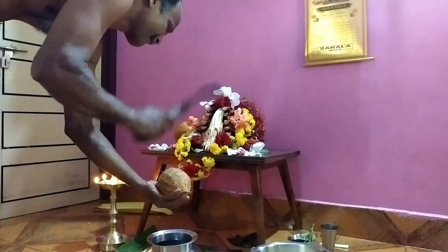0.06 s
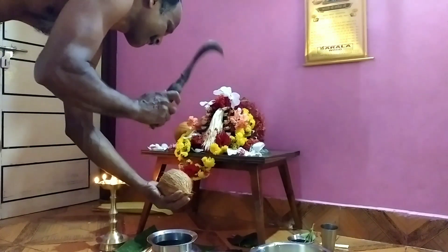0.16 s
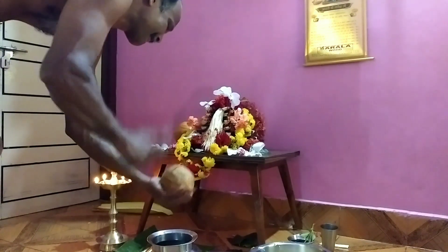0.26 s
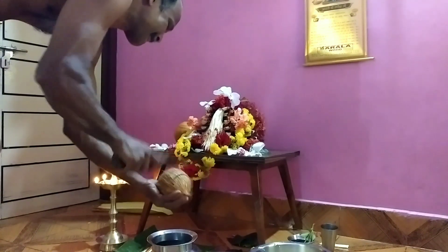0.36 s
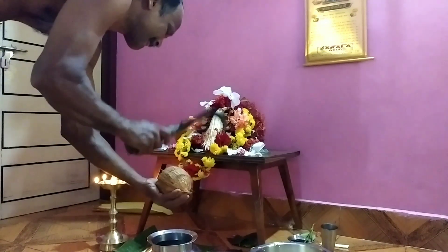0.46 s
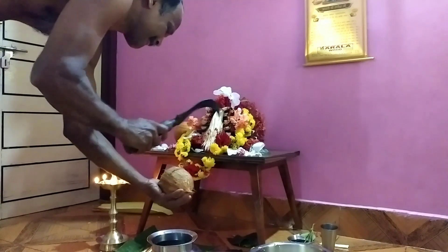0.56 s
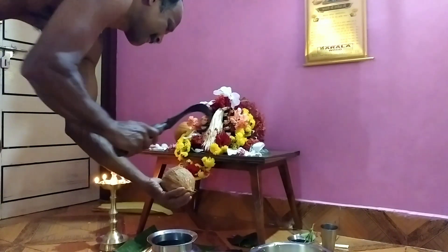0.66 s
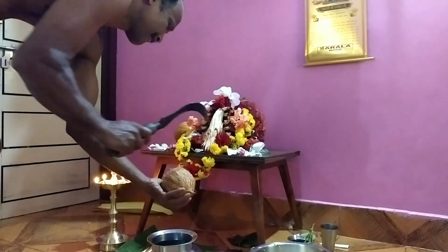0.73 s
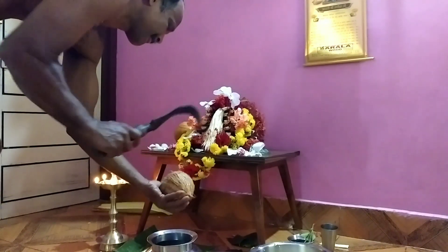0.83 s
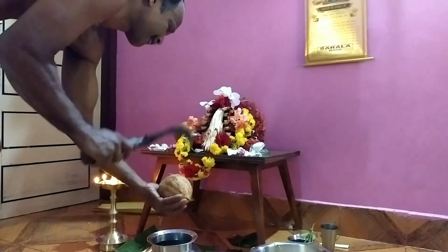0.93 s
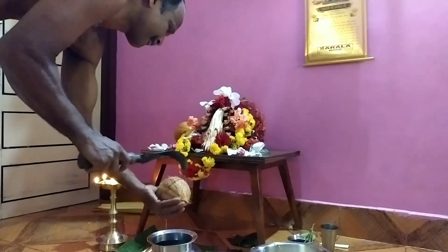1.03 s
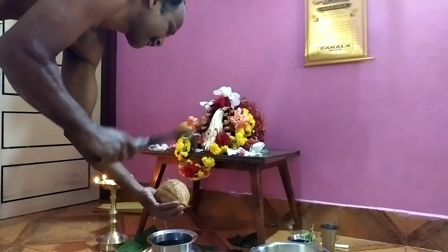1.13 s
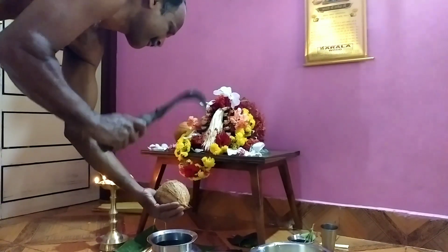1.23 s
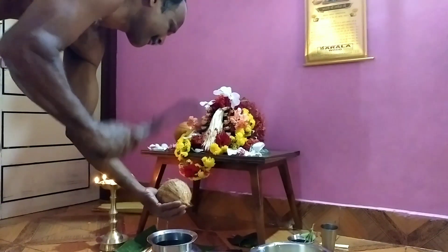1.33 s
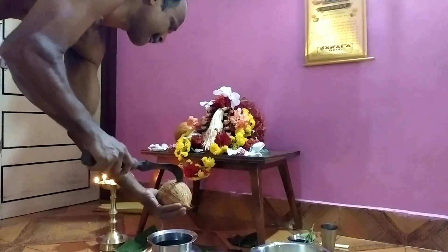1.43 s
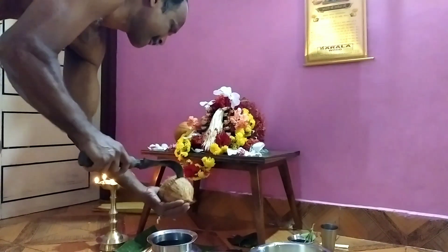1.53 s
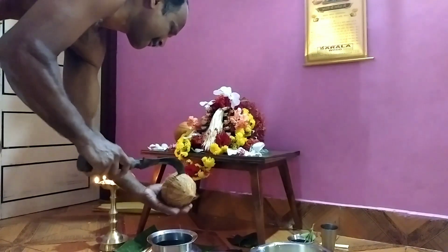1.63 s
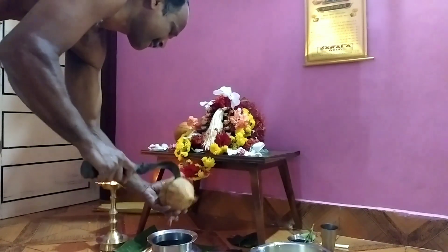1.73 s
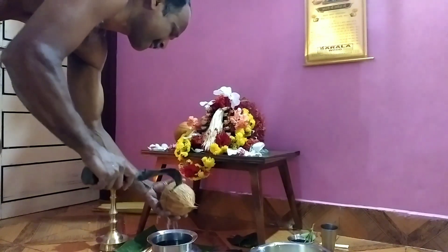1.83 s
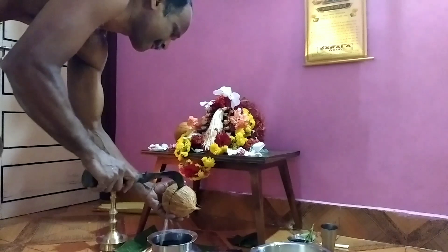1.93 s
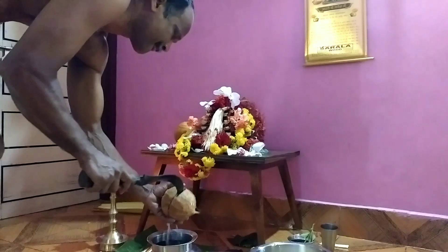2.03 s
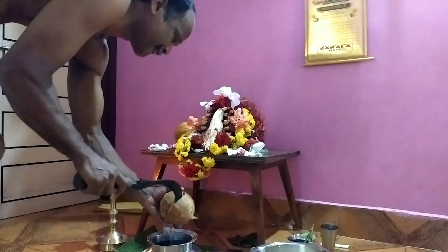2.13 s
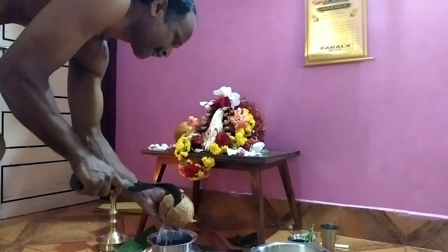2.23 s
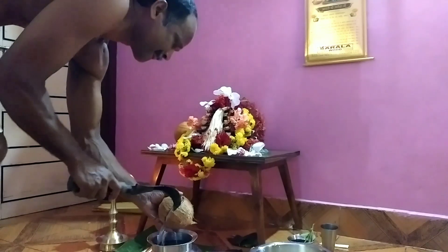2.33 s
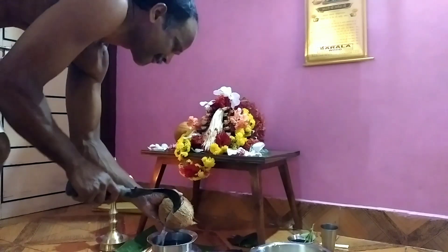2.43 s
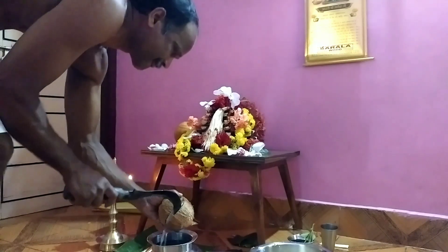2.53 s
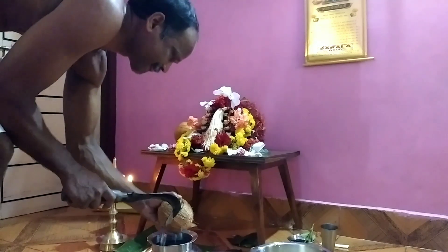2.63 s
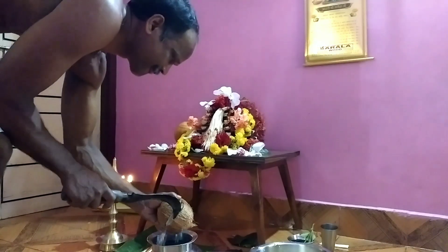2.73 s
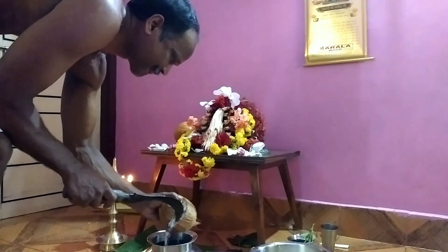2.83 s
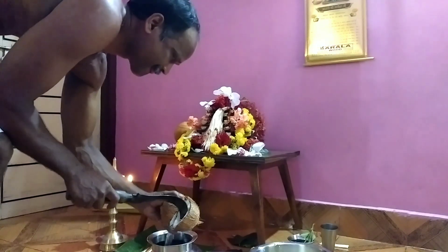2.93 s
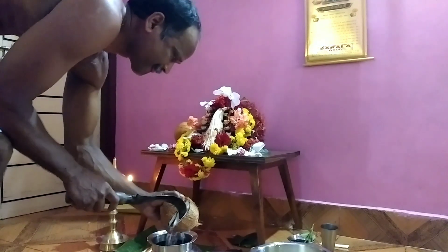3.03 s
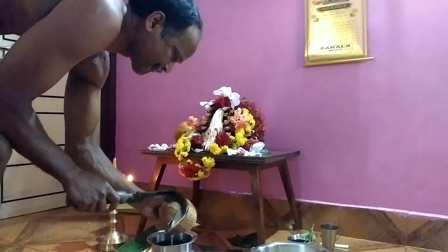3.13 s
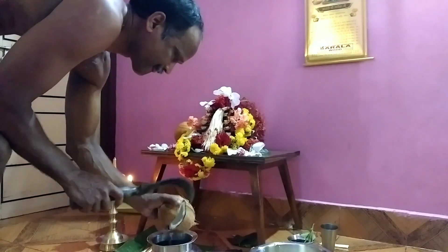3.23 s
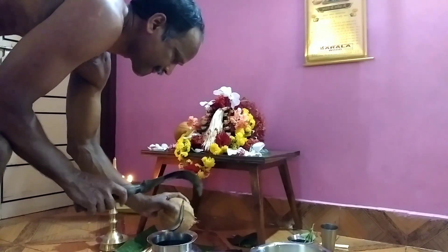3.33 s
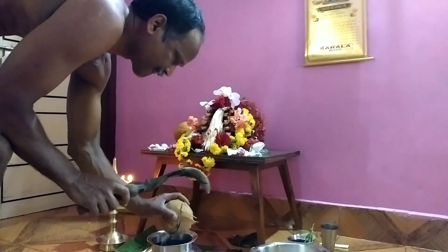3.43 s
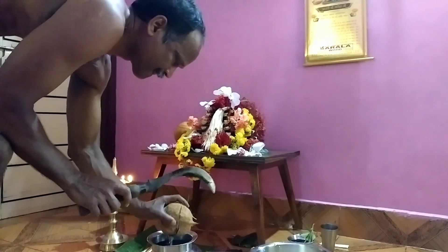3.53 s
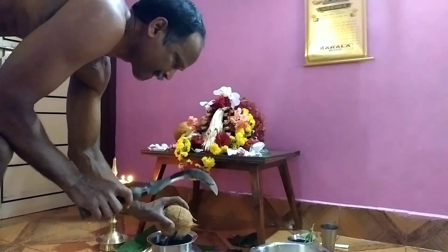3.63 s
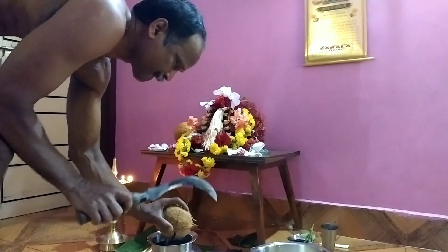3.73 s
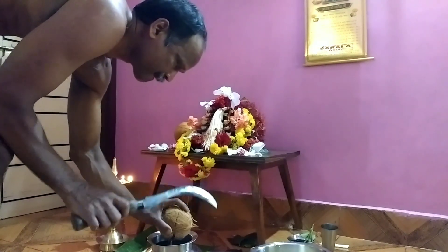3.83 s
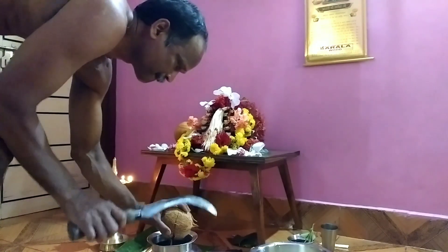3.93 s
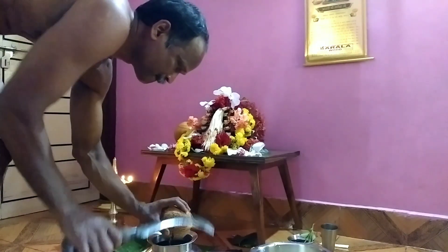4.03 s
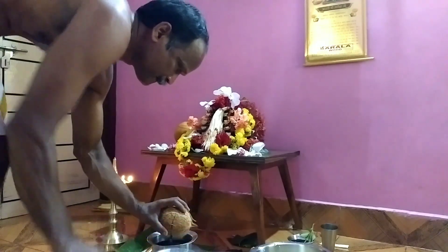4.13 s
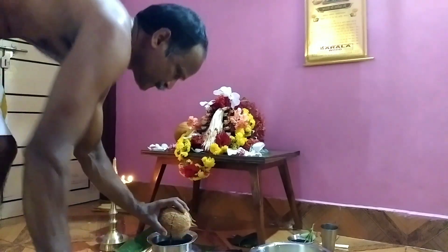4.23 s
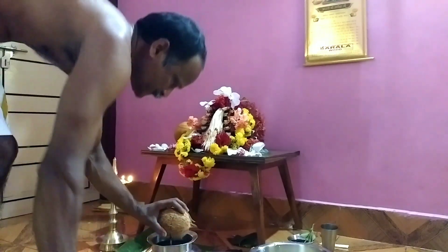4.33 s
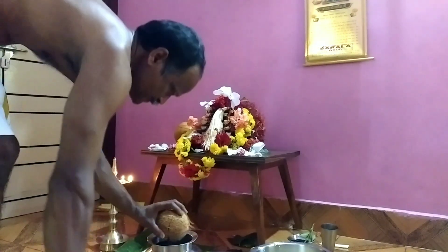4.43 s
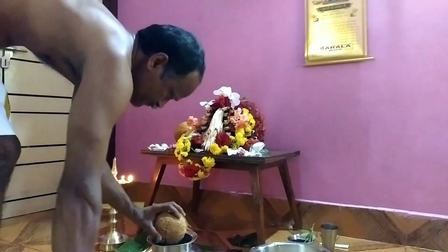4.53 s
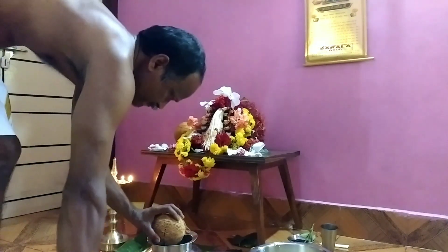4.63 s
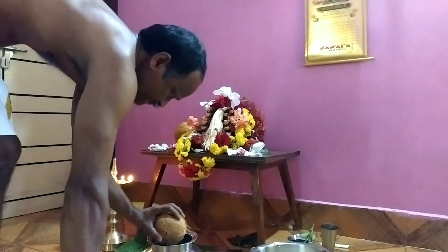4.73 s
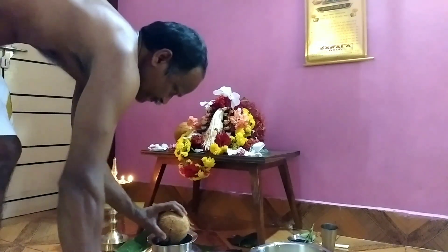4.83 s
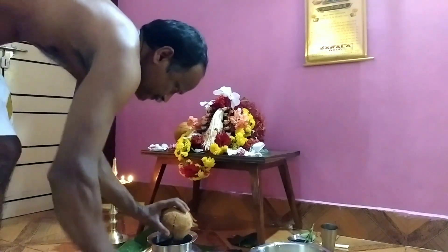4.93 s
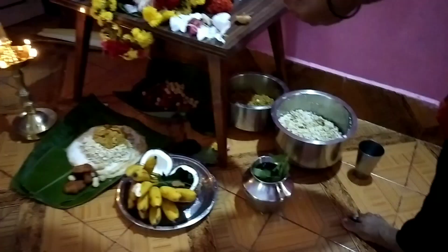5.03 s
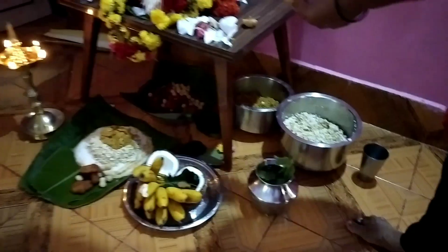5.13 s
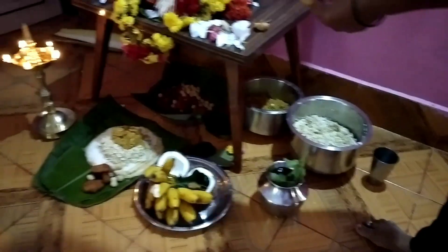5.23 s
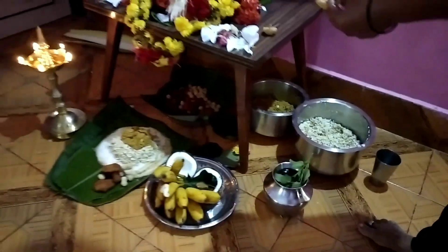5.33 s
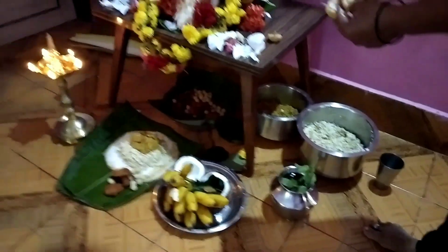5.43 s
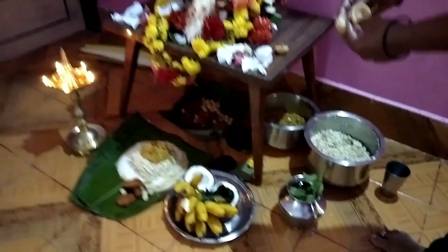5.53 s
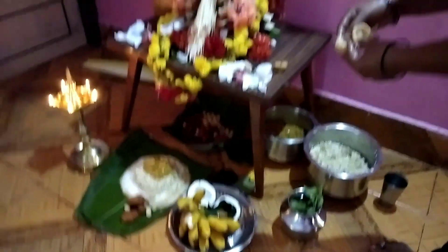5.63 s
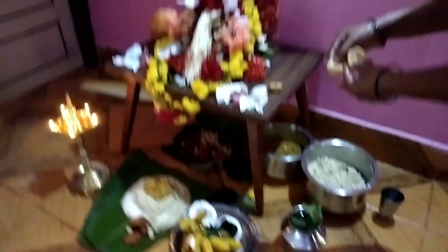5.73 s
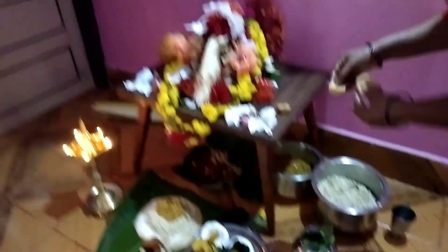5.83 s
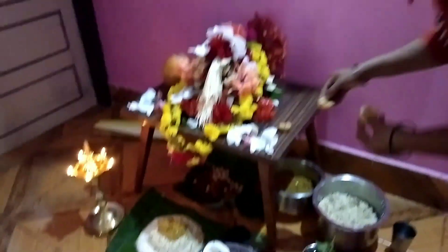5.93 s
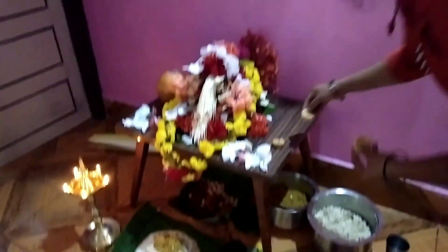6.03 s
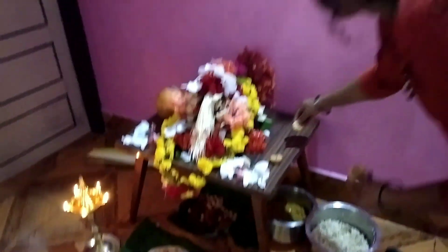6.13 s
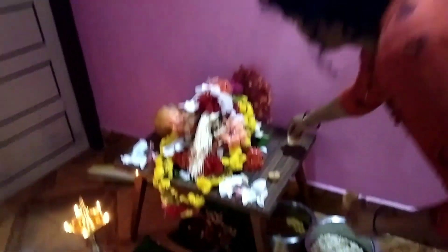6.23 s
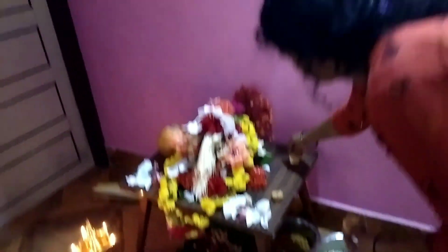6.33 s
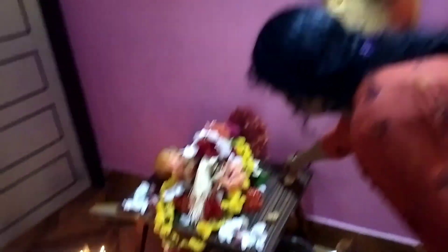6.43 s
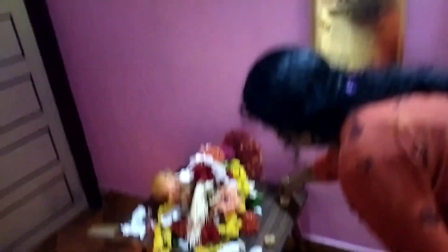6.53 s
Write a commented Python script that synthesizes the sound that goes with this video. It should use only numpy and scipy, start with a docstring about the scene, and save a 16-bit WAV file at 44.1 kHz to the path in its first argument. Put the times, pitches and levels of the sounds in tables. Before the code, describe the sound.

A phone close by catches three woody, steely whacks on a coconut, the first loudest, with bright room reverberation. Sharp cracks follow as the shell is prised apart and its water fizzes, plops and glugs into a ringing metal pot. After the flow dwindles, a blade lands hard on tile and clatters. A hard cut leads to faint hiss, a thin flickering high tone and small dry bumps.

```python
"""Bare tiled room: over the tail of an earlier blow, a heavy knife strikes a coconut three times. The shell
cracks and is prised open; its water gulps out, splashes and trickles into a metal pot; the knife lands on the tiles.
After a cut to silence a quieter shot fades in: hiss, a thin flickering high tone, handling knocks. Impacts are shaped
noise bursts with room tails; water is patchy noise, drops and bubbles; gain control and a limiter hold loud sounds down.
"""
import sys
import numpy as np
from scipy import signal
from scipy.fft import rfft, irfft, next_fast_len
from scipy.io import wavfile
from scipy.ndimage import uniform_filter1d, minimum_filter1d, map_coordinates

SR = 44100
rng = np.random.default_rng(int(sys.argv[2]) if len(sys.argv) > 2 else 0)


def master_out(mix):
    """Clip the mix to full scale and print it as 16-bit PCM to the path in sys.argv[1]."""
    frames = np.transpose(np.atleast_2d(mix))
    ceiling = np.clip(frames, -1, 1)
    pcm = np.round(ceiling * 32767).astype(np.int16)
    wavfile.write(sys.argv[1], SR, pcm)


N = 289737
LEAD_S = .01  # from the start of an impact buffer to its onset
CUT_S, BACK_S = 4.9303, 5.055  # first shot ends, second begins
SIDES = np.array([[.5], [-.5]])  # splits a left-minus-right dB between the channels


def amp(db):
    """Decibels to gain."""
    return 10 ** (np.asarray(db) / 20)


def unit(x):
    """Scaled to rms 1."""
    return x / np.sqrt(np.mean(x ** 2) + 1e-20)


def along(points, hz):
    """Interpolates (f/Hz, value) points on a log frequency axis."""
    f, v = np.transpose(points)
    return np.interp(np.log(hz + 1), np.log(f + 1), v)


def wobble(rate_hz, size=N):
    """Smooth random curve with rate_hz knots a second."""
    knots = rng.standard_normal(int(size * rate_hz / SR) + 4)
    return map_coordinates(knots, [np.arange(size) * rate_hz / SR])


def patches(shape, bins, frames):
    """Random field of rms 1, smooth over some bins and frames."""
    field = uniform_filter1d(rng.standard_normal(shape), size=bins, axis=0)
    return unit(uniform_filter1d(field, size=frames, axis=1))


def filtered(x, response):
    """Multiplies the spectrum of x by a complex response of frequency."""
    m = next_fast_len(x.shape[-1] + 8192)
    spectrum = rfft(x, m) * response(np.fft.rfftfreq(m, 1 / SR))
    return irfft(spectrum, m)[..., :x.shape[-1]]


def resonances(modes, f):
    """Causal sum of (f/Hz, width/Hz, level/dB) resonances of alternating sign."""
    total = 0
    for k, (centre, width, db) in enumerate(modes):
        damping = 1j * f * width
        total = total + (-1) ** k * amp(db) * damping / (centre * centre - f * f + damping)
    return total


def hump(hz, width):
    """One spectral hump: a resonance squared; width is a share of hz, at least .05."""
    return lambda f: resonances([(hz, max(width, .05) * hz, 0)], f) ** 2


# left-right likeness: f/Hz, likeness [0-1]
LIKENESS = [(100, 0.96), (300, 0.18), (600, 0.33), (900, 0.51), (1500, 0.018), (15000, .05)]


def stereo(pair):
    """Mixes two signals as mid and side; likeness per frequency sets their shares."""
    turn = lambda hz: np.arccos(np.clip(along(LIKENESS, hz), -1, 1)) / 2
    mid, side = filtered(pair, lambda hz: np.array([np.cos(turn(hz)), np.sin(turn(hz))]))
    return np.array([mid + side, mid - side])


def add(track, s, sound):
    """Mixes in a sound whose onset, LEAD_S after its start, falls at s."""
    k = round((s - LEAD_S) * SR)
    part = sound[:, max(-k, 0):N - k]
    track[:, max(k, 0):max(k, 0) + part.shape[1]] += part


# room decay: f/Hz, t60/s
ROOM_DECAY = [(100, 1.4), (260, 0.91), (700, 0.83), (1840, 0.71), (4850, 0.65), (12800, 0.4)]
ECHO_REF_DB = -18.5  # tail rms re burst peak at echo_db 0


def room_tail(size):
    """Overlapping noise grains; each frequency decays at its own t60, unevenly."""
    hz, frame_s = np.fft.rfftfreq(256, 1 / SR), np.arange(size // 128 + 2) * 128 / SR
    shape = (len(hz), len(frame_s))
    lingering_db = 2.89 * patches(shape, 2, 70)
    standout_db = .7 * patches(shape, 20, 2)
    gain = amp(lingering_db + standout_db - 60 * frame_s / along(ROOM_DECAY, hz)[:, None]).T
    window = np.sin(np.pi * (np.arange(256) + .5) / 256)
    grains = irfft(rfft(rng.standard_normal((2, len(frame_s), 256))) * gain) * window
    return (grains[:, :-1, 128:] + grains[:, 1:, :128]).reshape(2, -1)[:, :size]


def impact(colour, db, echo_db, rise_s, size):
    """Short decaying noise burst and its room tail, both through one colour."""
    t = np.maximum(np.arange(size) / SR - LEAD_S, 0)
    start = 1 - np.exp(-t / max(rise_s, 1e-4))
    burst = start * amp(-60 * t / (0.011 + 3 * rise_s)) * rng.standard_normal((2, size))
    build_up = 1 - np.exp(-t / 0.0017)  # echoes need a few ms to pile up
    tail = room_tail(size) * start * build_up
    burst, tail = filtered(np.array([burst, tail]), colour)
    tail = tail / np.sqrt(np.mean(tail[:, :SR // 10] ** 2))
    return amp(db) * (burst / np.abs(burst).max() + amp(echo_db + ECHO_REF_DB) * tail)


def knocks(table, echo_db, cycles, size):
    """Small impacts, one hump each; the rise time spans some cycles of its centre."""
    out = np.zeros((2, N))
    for s, db, hz, width in table:
        add(out, s, impact(hump(hz, width), db, echo_db, cycles / hz, size))
    return out


# hiss spectrum: f/Hz, relative level/dB
HISS_SPECTRUM = [(18, -57.5), (30, -38), (75, -12.5), (240, -8), (450, -6), (860, -8.5), (2000, -13),
                 (4300, -11), (6000, -18), (8300, -20.5), (8800, -8), (10200, -9.5), (10700, -24),
                 (15000, -27.5)]
# hiss balance: f/Hz, left minus right/dB
HISS_BALANCE = [(100, 8), (700, -1.5), (2000, 2.5), (4400, -1.5), (8000, 3), (14000, 8)]


def hiss(db):
    """Room and microphone noise: shaped noise, slightly wavering, balance varying with frequency."""
    colour = lambda f: amp(along(HISS_SPECTRUM, f) + SIDES * along(HISS_BALANCE, f))
    noise = filtered(rng.standard_normal((2, N)), colour)
    return amp(db + 0.39 * wobble(7.3)) * unit(noise)


TONE_HZ, TONE_DRIFT_HZ, TONE_JITTER_HZ = 10080, 70.7, 40
TONE_BASE_DB, TONE_SLOW_FLICKER_DB, TONE_FAST_FLICKER_DB = -74.5, 3.5, 6
TONE_SIDES_DB = [[5], [-1.5]]  # left, right re base


def high_tone():
    """Thin flickering high sine, random in pitch and level, stronger on the left."""
    hz = TONE_HZ + TONE_DRIFT_HZ * wobble(9) + TONE_JITTER_HZ * wobble(40)
    tone = np.sin(2 * np.pi * np.cumsum(hz) / SR)
    level_db = TONE_BASE_DB + TONE_SLOW_FLICKER_DB * wobble(14) + TONE_FAST_FLICKER_DB * wobble(30)
    return amp(TONE_SIDES_DB) * amp(level_db) * tone


# knocks close to the phone: t/s, burst level/dB, f/Hz, width/f
HANDLING_KNOCKS = [(5.238, -50, 4510, .3), (5.326, -63, 110, .6), (5.604, -53.5, 688, 0.98),
                   (5.628, -53, 468, .46), (5.652, -53, 455, 0.74), (5.716, -53.5, 227, .5),
                   (5.718, -48, 1200, 2.3), (6.392, -36.5, 2240, 4.7), (6.505, -51.5, 700, 0.89),
                   (6.55, -60.5, 440, 0.56)]


def handling():
    """Small dry impacts, little room tail."""
    return knocks(HANDLING_KNOCKS, echo_db=-14, cycles=1.17, size=SR // 5)


def bubbles(count):
    """Droplets trap air that rings for a few cycles at a rising pitch."""
    when, pitch, size, side = rng.random((count, 4)).T[:, :, None]
    t = np.arange(1500) / SR
    hz = 1500 * 3.5 ** pitch
    life_s = 14 / hz
    envelope = amp(9.9 * size - 26 * t / life_s) * (1 - np.exp(-8 * t / life_s))
    blips = envelope * np.sin(2 * np.pi * hz * t * (1 + 0.15 * t / life_s))
    where = ((when * (N - len(t))).astype(int) + np.arange(len(t))).ravel()
    return np.array([np.bincount(where, (blips * share).ravel(), N) for share in (side, 1 - side)])


# trickle level: t/s, level/dB
TRICKLE_LEVEL = [(1.996, -45), (2.4, -45.5), (2.7, -45.5), (3.1, -40), (3.4, -47), (3.58, -57), (3.9, -55),
                 (4.2, -53.5), (4.6, -57), (4.93, -68.5)]
# water spectrum: f/Hz, relative level/dB
WATER_SPECTRUM = [(350, -37.5), (700, -13.5), (1300, -18.5), (2100, -12), (3800, -7.5), (6000, -9),
                  (8800, -1), (12000, -4), (15000, -7.5)]


def trickle():
    """Water running into the pot: patchy fizz, random drop clicks and ringing bubbles."""
    s, db = np.transpose([(1.982, -90)] + list(TRICKLE_LEVEL))
    level_db = np.interp(np.arange(N) / SR, s, db)
    z = signal.stft(rng.standard_normal((2, N)), nperseg=512)[2]
    patchy = z * amp(2.9 * patches(z.shape[1:], 10, 2))
    fizz = signal.istft(patchy, nperseg=512)[1][:, :N]
    hits = rng.random(N) < 300 / SR  # 300 drops/s on average
    drops = hits * amp(5 * rng.exponential(1, N)) * rng.standard_normal((2, N))
    mix = unit(fizz) + 0.29 * unit(drops) + 0.28 * unit(bubbles(count=260))
    water = filtered(mix, lambda f: amp(along(WATER_SPECTRUM, f)))
    return amp(level_db + 3.1 * wobble(9.9)) * unit(water)


# hollow notes and thuds: t/s, burst level/dB, f/Hz, width/f
PLOP_HITS = [(1.992, -41.5, 556, 0.57), (2.04, -47, 530, 0.072), (2.2, -52, 747, 0.12),
             (2.33, -52, 754, 0.18), (2.572, -48, 1350, 0.044), (2.62, -54.5, 1096, 0.04),
             (2.87, -42, 827, 0.24), (2.92, -48.5, 312.5, 0.15), (2.94, -34.5, 960, 0.54),
             (3.1, -44, 1400, .17), (3.305, -37.5, 380, 0.85), (3.33, -37, 328, 0.64),
             (3.36, -39, 407, 1.8), (4.085, -46.5, 1480, 0.31), (4.472, -46, 1045, 0.19),
             (4.56, -49.5, 1133, 0.043), (4.645, -48, 633, 0.33), (4.807, -31.5, 335, 1.8),
             (4.815, -38, 1450, .08)]


def plops():
    """Slow-rising hollow humps with a strong room tail."""
    return knocks(PLOP_HITS, echo_db=7, cycles=7, size=3 * SR // 5)


# water leaving the shell: t/s, burst level/dB, f/Hz, width/f
GULP_HITS = [(3.2, -30, 2800, 1.7), (3.219, -26, 2030, 0.43), (3.238, -27.5, 3930, 0.41),
             (3.278, -28, 2230, 0.4), (3.635, -37, 2090, .2), (3.652, -29.5, 2880, .6),
             (3.812, -31.5, 2200, 1.2), (4.574, -25, 3890, .3)]


def gulps():
    """Close, dry gulps: slow-rising humps with a weak room tail."""
    return knocks(GULP_HITS, echo_db=-5.5, cycles=9, size=SR // 3)


# splashes into the pot, fibre snaps: t/s, burst level/dB, f/Hz, width/f, softness [0-1]
SNAP_HITS = [(1.990, -25.5, 5125, 7.1, 0.2), (2.034, -26.5, 5540, 1.9, 0.3), (2.129, -37, 8900, 1.3, .6),
             (2.157, -38, 3850, .55, 0.45), (2.221, -36, 3060, .55, 0.6), (2.23, -35.5, 9100, 0.55, 1),
             (2.265, -18, 4820, 0.39, 0.01), (2.403, -20.5, 6500, 2.2, .01), (2.440, -18, 5120, 1.02, 0.31),
             (2.469, -43, 2320, 0.56, .64), (2.741, -21.5, 6800, .54, 0.18),
             (2.858, -19.5, 6000, 2.2, 0.55), (2.925, -4.5, 6600, 2.2, .02),
             (2.94, -17.5, 7360, 0.37, 0.33), (3.14, -32.5, 6240, 1, 0.95), (3.24, -34.5, 4420, 0.83, 0.85),
             (3.285, -33, 6350, 1.2, 0.89), (3.33, -29.5, 1670, 1.9, 0.31), (3.439, -35, 10400, 0.25, 0.3),
             (3.599, -36, 6650, 1.8, 0.54), (3.619, -27.5, 7160, 1.1, 0.48),
             (3.653, -34.5, 2980, 1.5, 0.68), (3.76, -43, 1990, .4, 0.9), (3.796, -33.5, 7540, 1.5, 0.87),
             (3.805, -33.5, 2400, 1.4, 0.56), (3.866, -32.5, 7400, 0.44, 0.45), (4.0, -43.5, 8250, .7, 0.9),
             (4.021, -41, 4770, 0.51, 0.92), (4.158, -41.5, 7100, .8, 0.6), (4.228, -47.5, 2660, .7, 0.4),
             (4.236, -33, 7100, 1.8, 0.83), (4.361, -33.5, 8400, 0.18, 0.54), (4.375, -42, 2470, .5, .8),
             (4.44, -39, 3580, .6, 0.59), (4.543, -36.5, 7100, 6.2, 0.87)]
# pot ring: f/Hz, width/Hz, level/dB
POT_MODES = [(1428, 21, 5), (1986, 53, 6), (2444, 98, -3), (2955, 95, 8), (3860, 89, -8.5),
             (4670, 200, 7.5), (7350, 180, -5), (8280, 140, 4)]
SHARP_RISE_S, SOFT_RISE_S, SHARP_ECHO_DB, SOFT_ECHO_DB = .0004, 0.016, -4, 9.5


def snaps():
    """Splashes and snaps, one hump each, all ringing the pot; softness slows the start and feeds the wash."""
    out = np.zeros((2, N))
    for s, db, hz, width, soft in SNAP_HITS:
        soft = np.clip(soft, 0, 1)
        colour = lambda f: hump(hz, width)(f) * (1 + resonances(POT_MODES, f))
        rise_s = SHARP_RISE_S * (SOFT_RISE_S / SHARP_RISE_S) ** soft
        echo_db = SHARP_ECHO_DB + soft * (SOFT_ECHO_DB - SHARP_ECHO_DB)
        add(out, s, impact(colour, db, echo_db, rise_s, size=2 * SR // 5))
    return out


# knife meets tiles: t/s, burst level/dB, echo/dB
TILE_CONTACTS = [(4.645, -5.5, 1.5), (4.659, -16.5, 7), (4.686, -27.5, -15), (4.707, -27.5, -8.5),
                 (4.759, -36, -3), (4.813, -20.5, -2.5), (4.9186, -10, -2), (4.9205, 4.5, -5)]
# blade ring: f/Hz, width/Hz, level/dB
BLADE_MODES = [(1970, 160, -9), (2600, 290, 8), (2990, 340, 1.5), (4500, 79, 5.5), (5350, 200, -7.5),
               (6430, 290, 0.5), (7500, 230, -6.5), (8420, 200, 1.5), (9720, 170, -8.5)]
# steel clash: f/Hz, relative level/dB
STEEL_SPECTRUM = [(300, -38.5), (1200, -15.5), (2500, -13), (4500, -5), (8500, -3.5), (12000, -4),
                  (15000, -10.5)]


def clatter():
    """Each tile contact is a broad clash ringing the blade modes."""
    out = np.zeros((2, N))
    colour = lambda f: amp(along(STEEL_SPECTRUM, f)) * (1 + amp(9.0) * resonances(BLADE_MODES, f))
    for s, db, echo_db in TILE_CONTACTS:
        add(out, s, impact(colour, db, echo_db, 0.00012, size=SR // 2))
    return out


def unsteady_tone(hz, t60_s, t):
    """Decaying tone whose level varies at random, separately in each channel."""
    level_db = 2.9 * np.array([wobble(17, size=len(t)), wobble(15, size=len(t))])
    tone = np.sin(2 * np.pi * (hz * t + rng.random((2, 1))))
    return amp(level_db - 60 * t / t60_s) * tone * (1 - np.exp(-t / .015))


# blows: t/s, crack level/dB, brightness/(dB/octave), echo/dB, boom/dB re crack, cracked [0-1],
# edge tick level/dB, blade note/dB re crack
KNIFE_BLOWS = [(-.1, -18.5, -2, 12.5, -28.5, 0, -40.5, 2.5), (0.3821, 14.5, -1, 0, -40.5, 0.12, -6, -30),
               (1.112, -11.5, -2.5, -5, -37.5, 0.01, -15, -29),
               (1.473, 0, -2.35, -4, -41, 0.88, 2.5, -32.5)]
# whole nut ring: f/Hz, width/Hz, level/dB
WHOLE_MODES = [(712, 89, -10.5), (1386, 39, 3), (1932, 33, -11.5), (2237, 120, -1), (2683, 300, -10),
               (3534, 64, -11), (3550, 44, -10), (4290, 26, -2)]
# cracked nut ring: f/Hz, width/Hz, level/dB
CRACKED_MODES = [(580, 82, -2), (724, 40, -3), (980, 27, -13), (1410, 17, -11.5), (2190, 80, -8.5),
                 (2530, 270, 2.5), (4250, 59, -18)]
# steel on shell: f/Hz, relative level/dB
CRACK_SPECTRUM = [(60, -45), (100, -37.5), (190, -14.5), (390, -11.5), (680, -5.5), (1400, -2.5),
                  (4300, -1.5), (6000, -8.5), (8500, -6), (12000, -9), (15000, -18)]
# room modes: f/Hz, left/dB, right/dB, t60/s
BOOM_MODES = [(191.6, -0.9, -15, 1.3), (247.4, -1, -14.5, 0.4), (278, 0.5, -11.5, 1.3),
              (330.4, -15.5, -5, 1.5)]
# air note of the opened nut, sinking as it empties: f/Hz, level/dB re crack, t60/s, glide/(Hz/s)
AIR_NOTE = (552, -29.5, 1.36, -45)
EDGE_HZ, EDGE_WIDTH, EDGE_ECHO_DB, EDGE_RISE_S = 8400, 0.95, -8.5, 0.0011
NOTE_HZ, NOTE_WIDTH, NOTE_ECHO_DB = 2030, .07, 9  # note left in the blade
THUMP_HZ, THUMP_WIDTH, THUMP_AT_0_DB, THUMP_DB_PER_DB = 202, 1.1, -30.5, 1.6  # swings wider than the crack


def blows():
    """Each blow cracks, ticks, thumps, rings shell and blade, and wakes room modes and the opened nut's air."""
    out, t = np.zeros((2, N)), np.maximum(np.arange(3 * SR // 2) / SR - LEAD_S, 0)
    air_hz, air_db, air_t60_s, glide = AIR_NOTE
    for s, db, bright_db, echo_db, boom_db, cracked, tick_db, note_db in KNIFE_BLOWS:
        broken = np.clip(cracked, 0, 1)
        shell = lambda f: (1 - broken) * resonances(WHOLE_MODES, f) + broken * resonances(CRACKED_MODES, f)
        tilt_db = lambda f: bright_db * np.log2((f + 50) / 2000)
        colour = lambda f: amp(along(CRACK_SPECTRUM, f) + tilt_db(f)) * (1 + amp(10.5) * shell(f))
        tick = impact(hump(EDGE_HZ, EDGE_WIDTH), tick_db, EDGE_ECHO_DB, EDGE_RISE_S, size=SR // 2)
        crack = stereo(impact(colour, db, echo_db, 0.00016, size=len(t)))
        thump_db = THUMP_AT_0_DB + THUMP_DB_PER_DB * db
        thump = stereo(impact(hump(THUMP_HZ, THUMP_WIDTH), thump_db, -12, .002, size=SR // 4))
        note = impact(hump(NOTE_HZ, NOTE_WIDTH), db + note_db, NOTE_ECHO_DB, .001, size=SR // 2)
        boom = sum(amp([[left], [right]]) * unsteady_tone(hz, t60_s, t) for hz, left, right, t60_s in BOOM_MODES)
        air = unsteady_tone(air_hz + glide * t / 2, air_t60_s, t)  # phase of a linear glide
        ringing = amp(db + boom_db) * boom + broken ** 2 * amp(db + air_db) * air
        for sound in (tick, crack, thump, note, ringing):
            add(out, s, sound)
    return out


# hiss level/dB: first shot, second shot
HISS_LEVELS_DB = (-60, -64.5)
SHOT_GAIN_DB = 3.5  # second shot, fully faded in
QUICK_DB, QUICK_S, SLOW_DB, SLOW_S = -32, 0.0093, -8.5, 0.16  # fade-in shortfalls, closing times


def scene():
    """Two shots, one after the other; the second fades in."""
    t = np.arange(N) / SR
    first = blows() + stereo(snaps() + plops() + gulps()) + clatter() + trickle() + hiss(HISS_LEVELS_DB[0])
    second = stereo(handling()) + hiss(HISS_LEVELS_DB[1]) + high_tone()
    since = np.maximum(t - BACK_S, 0)
    fade_db = SHOT_GAIN_DB + QUICK_DB * np.exp(-since / QUICK_S) + SLOW_DB * np.exp(-since / SLOW_S)
    return first * (t < (CUT_S + BACK_S) / 2) + second * amp(fade_db) * (t > BACK_S)


# microphone response: f/Hz, gain/dB
MIC_RESPONSE = [(3000, -1), (4700, -1), (4900, -7.5), (5800, -3.5), (7000, 0), (8500, 1.5), (10500, -5),
                (13000, -4), (15000, -10)]
# port balance: f/Hz, left minus right/dB
PORT_BALANCE = [(60, 8.5), (150, 9), (300, 10), (600, -0.1), (4000, -1), (9000, 1), (14000, 6.5)]
TOP_HZ, HOLD_RMS_DB, HOLD_S, LIMIT = 14500, -15.5, 0.012, .77


def record(dry):
    """Two microphone ports, gain control, peak limiter, cut to silence, steep band limit."""
    ports = lambda hz: amp(along(MIC_RESPONSE, hz) + SIDES * along(PORT_BALANCE, hz))
    heard = filtered(dry, lambda hz: ports(hz) / (1 + (hz / TOP_HZ) ** 60))
    keep = np.exp(-1 / (HOLD_S * SR))
    power = signal.lfilter([1 - keep], [1, -keep], np.mean(heard ** 2, axis=0))
    loudness = np.sqrt(power + 1e-12)
    held = heard * np.minimum(1, amp(HOLD_RMS_DB) / loudness)
    need = np.minimum(1, LIMIT / (np.abs(held).max(axis=0) + 1e-9))
    gain = uniform_filter1d(minimum_filter1d(need, size=260), size=130)
    t = np.arange(N) / SR
    edit = np.where(t < BACK_S, np.clip((CUT_S - t) * 1000, 0, 1), 1)  # 1 ms fade, then silence
    return filtered(held * gain * edit, lambda hz: 1 / (1 + (hz / (1.07 * TOP_HZ)) ** 60))


dry = scene()
out = record(dry)
master_out(out)
```